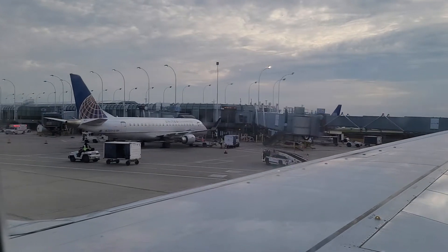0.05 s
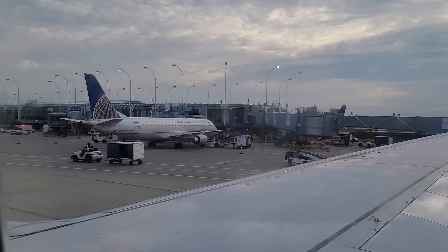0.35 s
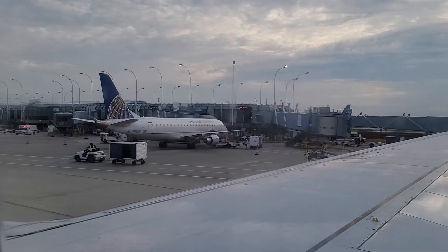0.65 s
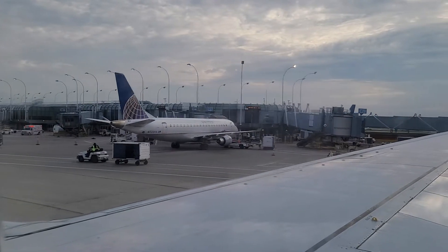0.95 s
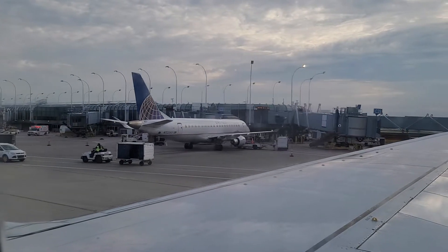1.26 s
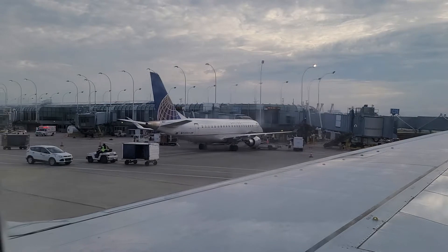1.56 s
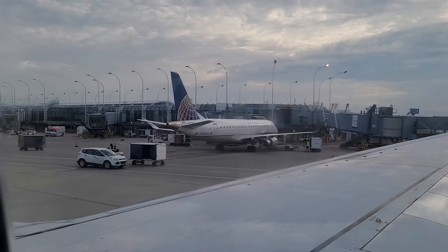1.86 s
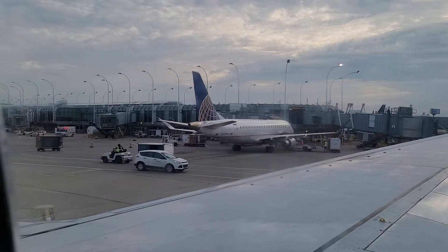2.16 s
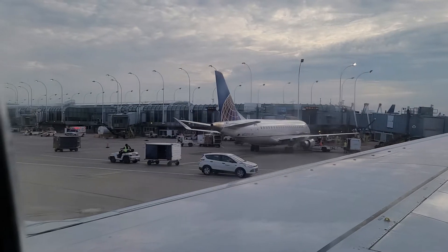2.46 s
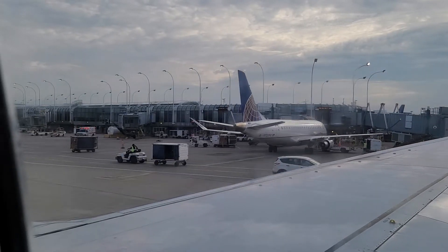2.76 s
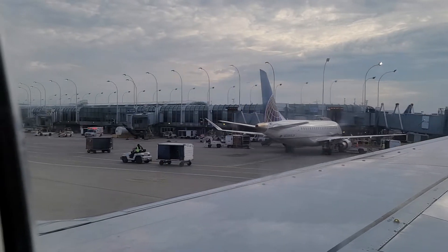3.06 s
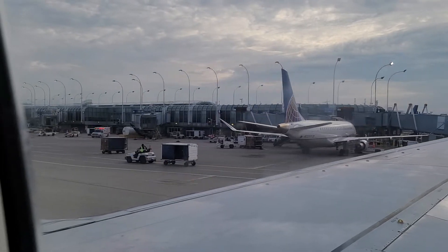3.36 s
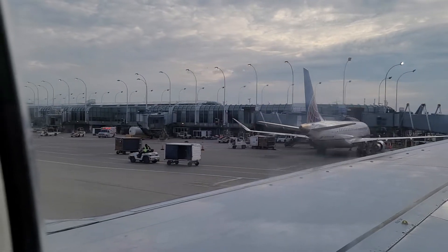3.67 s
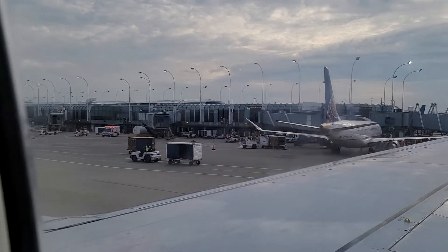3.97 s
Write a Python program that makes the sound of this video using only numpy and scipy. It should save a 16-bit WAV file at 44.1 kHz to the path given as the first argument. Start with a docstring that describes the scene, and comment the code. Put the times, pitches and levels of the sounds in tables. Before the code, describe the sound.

A taxiing airliner rumbles deeply throughout, heard inside the cabin with rushing air vents and faint hums and whines. Low wheel thumps come through the floor at about 0.7 and 2 seconds, with weaker ones earlier. Plastic trim knocks at 1.6 and 2.1 seconds. A brief soft swish ends in a tick near 2.5 seconds, and a soft hollow thud follows at 2.9. Tiny ticks sound close by.

```python
"""A deep rumble of wheels and engines through the fuselage, and the rush of the vents: a taxiing airliner,
heard in stereo from a window seat. Engine shafts, fans and a pump hum and whine over it, each reaching
the two ears differently. Joints in the apron thump through the floor, the cabin trim knocks, and small
things tick close to the microphone. Later come a brief swish and the soft thud of a hollow fitting."""
import sys
import numpy as np
from scipy.fft import rfft, irfft, next_fast_len
from scipy.io import wavfile
from scipy.ndimage import map_coordinates

SR = 44100
rng = np.random.default_rng(int(sys.argv[2]) if len(sys.argv) > 2 else 0)


def unload_wav(signal):
    """Save mono or channel-first audio to the path in sys.argv[1] as 16-bit WAV at rate SR, clipped to [-1, 1]."""
    wavfile.write(
        sys.argv[1],
        SR,
        np.round(np.clip(np.atleast_2d(signal).T, -1, 1) * 32767).astype(np.int16),
    )


N = 176400
TOP_HZ = 15780  # the recorder's band limit
TICK_RISE_S = .0007
WANDER_PER_S = 5  # pace of the pitch drift in the machines and whines


def amp(db):
    """Decibels to gain."""
    return 10 ** (np.asarray(db) / 20)


def unit(x):
    """Scaled to rms 1."""
    return x / np.sqrt(np.mean(x ** 2) + 1e-20)


def along(points, hz):
    """(Hz, value) points read on a log axis."""
    freqs, values = np.transpose(points)
    return np.interp(np.log(hz + 1), np.log(freqs + 1), values)


def clock():
    """The time of every sample, in seconds."""
    return np.arange(N) / SR


def sides(difference):
    """Half of a difference added on the left, half taken from the right."""
    return np.array([[.5], [-.5]]) * difference


def wobble(knots_per_s):
    """A smooth random curve."""
    return map_coordinates(rng.standard_normal(4096), [clock() * knots_per_s], mode="wrap")


def filtered(x, response):
    """x through a filter given as gain against frequency."""
    size = next_fast_len(N + SR // 2)
    return irfft(rfft(x, size) * response(np.fft.rfftfreq(size, 1 / SR)), size)[..., :N]


def noise(response):
    """Two unrelated coloured noises, together of rms 1."""
    return unit(filtered(rng.standard_normal((2, N)), response))


def band(hz, centre_hz, width_hz):
    """Gain of a resonance."""
    return 1 / (1 + ((hz - centre_hz) / width_hz) ** 2 * 2)


def rush(spectrum, likeness, pan, lead):
    """Stereo noise of rms 1 with a given likeness, balance and phase between the ears."""
    def mid_and_side(hz):
        angle = np.arccos(np.clip(along(likeness, hz), -1, 1)) / 2
        return amp(along(spectrum, hz)) * [np.cos(angle), np.sin(angle)]

    mid, side = noise(mid_and_side)
    ears = lambda hz: amp(sides(along(pan, hz))) * np.exp(1j * sides(along(lead, hz)))
    return unit(filtered(np.array([mid + side, mid - side]), ears))


def burst(start_s, rise_s, t60_s):
    """Envelope of a small contact: quick rise, exponential fall."""
    t = np.maximum(clock() - start_s, 0)
    return (1 - np.exp(-t / rise_s)) * amp(-60 * t / t60_s)


def ring(modes, start_s):
    """The fading modes of a struck part, each at a chance phase."""
    out = np.zeros(N)
    for hz, db, t60_s in modes:
        mode = np.sin(2 * np.pi * (hz * clock() + rng.random()))
        out += amp(db) * burst(start_s, rise_s=.002, t60_s=t60_s) * mode
    return out


def rumble():
    """Wheels and engines shake the fuselage, nearly alike in both ears; deep bass follows the ground."""
    # rumble through the fuselage: frequency_hz, relative_db
    spectrum = [(12, -37), (23, -10.5), (31, -11), (50, -1), (64, -3), (100, -5.5), (132, -10.5),
                (165, -10.5), (195, -11), (220, -19), (295, -15), (370, -18), (600, -54), (1500, -91.5)]
    # how alike the two ears are: frequency_hz, correlation
    likeness = [(30, 1), (200, .97), (400, 0.72)]
    # balance at the seat: frequency_hz, left_minus_right_db
    pan = [(25, -3), (70, -0.5), (200, .5)]
    # phase between the ears: frequency_hz, left_lead_rad
    lead = [(30, 0.36), (100, 0.37), (200, .12)]
    # deepest bass over rougher and smoother ground: time_s, gain_db
    ground = [(0, -1.5), (.3, 3.5), (.9, -1.5), (1.8, -2.5), (2.6, 1), (2.9, -6.5), (3.4, 6), (3.75, -1),
              (4, 11.5)]
    level_db, deep_hz = -17.5, 87
    shake = amp(level_db + wobble(7)) * rush(spectrum, likeness, pan, lead)
    deep = filtered(shake, lambda hz: np.exp(-(hz / deep_hz) ** 4))
    return shake - deep + deep * amp(np.interp(clock(), *np.transpose(ground)))


def air():
    """The ventilation rushes through the cabin, and one vent sings in a broad resonance."""
    # rush of the cabin air: frequency_hz, relative_db
    spectrum = [(100, -32.5), (280, -9), (380, 0), (460, -2), (540, -6.5), (690, -9), (850, -11.5),
                (1120, -16), (1330, -11), (1600, -15), (1850, -18), (2300, -16.5), (2580, -19), (2850, -20),
                (3200, -23.5), (3500, -23.5), (4300, -32.5), (5200, -35.5), (6200, -41), (7100, -53),
                (7900, -51), (8500, -45), (10000, -52), (15500, -53.5)]
    # how alike the two ears are: frequency_hz, correlation
    likeness = [(350, .4), (700, 0.4), (1250, 0.57), (1700, 0.7), (2900, 0.41), (4000, 0.36), (7000, .05)]
    # balance at the seat: frequency_hz, left_minus_right_db
    pan = [(350, 0.5), (620, 4), (800, -3.5), (1200, -0.5), (2300, 0), (2800, -2), (4000, -6), (5200, -10),
           (6200, -5.5), (7200, 2)]
    # phase between the ears: frequency_hz, left_lead_rad
    lead = [(350, 0.76), (800, 1.86), (1200, 2.81), (2100, 1.88), (2900, 2.8), (3800, 1.43), (7000, 1.3)]
    flow_db, swell_db = -28, 1.03
    vent_db, vent_pan_db, vent_lead_rad = -39.5, 2.5, 1
    flow = amp(flow_db + swell_db * wobble(4.23)) * rush(spectrum, likeness, pan, lead)
    resonance = lambda hz: band(hz, centre_hz=2086, width_hz=162) * np.exp(1j * sides(vent_lead_rad))
    vent = unit(filtered(rng.standard_normal(N), resonance))
    return flow + amp(vent_db + sides(vent_pan_db)) * vent


def machines():
    """Each shaft or fan gives a tone that wanders a little and flutters in the turbulent air."""
    # rotating machines: pitch_hz, level_db, left_minus_right_db, left_lead_rad, wander_hz, roughness
    tones = [ (147.65, -30, -1, 0.33, .8, .2), (501, -35.5, 0, 1.9, 1.2, .3), (677, -48.5, 6, 0, .1, .1),
             (1498.4, -39.3, -4, 2.3, .7, .35), (1504, -42, -3, 2.3, 5, .7),
             (1692, -55, -7.5, 5, 1.536, .3), (2970.5, -56, -1, 3.1, 1.6, .2),
             (3004, -53.5, -6, -2.4, 5, .5), ]
    flutter_per_s = 22
    out = np.zeros((2, N))
    for hz, db, pan_db, lead_rad, wander_hz, roughness in tones:
        phase = 2 * np.pi * np.cumsum(hz + wander_hz * wobble(WANDER_PER_S)) / SR
        flutter = (wobble(flutter_per_s) + 1j * wobble(flutter_per_s)) / np.sqrt(2)
        steady = np.sqrt(1 - roughness ** 2)
        tone = (steady + roughness * flutter) * np.exp(1j * (phase + sides(lead_rad)))
        out += amp(db + sides(pan_db)) * unit(tone.real)
    return out


def whines():
    """Two whines close in pitch beat, sag and recover together; their balance shifts along the way."""
    # the pair of whines: pitch_hz, early_level_db, late_level_db
    pair = [(992.5, -52.5, -50.5), (1003.3, -43.2, -46)]
    # their common speed: time_s, share_of_usual_speed
    speed_curve = [(1.4, 1), (2.4, .9965), (3.55, .998), (4, 1.001)]
    shift_start_s, shift_end_s = 1.2, 1.7
    lead_rad, wander_hz = 1.1, 1.3
    t = clock()
    speed = np.interp(t, *np.transpose(speed_curve))
    out = np.zeros((2, N))
    for hz, early_db, late_db in pair:
        phase = 2 * np.pi * np.cumsum(hz * speed + wander_hz * wobble(WANDER_PER_S)) / SR
        db = np.interp(t, [shift_start_s, shift_end_s], [early_db, late_db])
        out += amp(db) * unit(np.cos(phase + sides(lead_rad)))
    return out


def pump():
    """A pump hums cleanly on the left and grows fainter as the plane rolls on."""
    # the receding hum: time_s, level_db
    fade = [(0, -30.5), (1.3, -31), (1.6, -35), (4, -34.5)]
    pitch_hz, pan_db, lead_rad = 338.6, 9, -1.63
    t = clock()
    gain = amp(np.interp(t, *np.transpose(fade)) + sides(pan_db))
    return gain * unit(np.sin(2 * np.pi * pitch_hz * t + sides(lead_rad)))


def thumps():
    """A wheel crosses a joint in the apron: the floor swings up over a few cycles and settles."""
    # swings of the floor: start_s, peak_db, pitch_hz, rise_s, fall_s
    swings = [(.335, -13, 76, 0.026, .012), (0.727, -4.5, 91.4, 0.018, 0.02),
              (1.35, -13.5, 41, 0.042, 0.043), (1.996, -11, 153.4, 0.022, 0.012),
              (2.035, -5.5, 54, 0.02, 0.027)]
    out = np.zeros(N)
    for start_s, db, hz, rise_s, fall_s in swings:
        t = np.maximum(clock() - start_s, 0)
        envelope = np.minimum(t / rise_s, 1) * np.exp(-np.maximum(t - rise_s, 0) / fall_s)
        out += amp(db) * envelope * np.sin(2 * np.pi * hz * t)
    return out


def ticks():
    """Faint grainy ticks near the microphone, some duller and some brighter, over a slight crackle."""
    # small ticks close by: start_s, level_db, left_minus_right_db, t60_s, tilt_db_per_octave
    contacts = [(.735, -59, 0, .14, 36), (1.355, -47, 3, .06, 0), (1.4455, -45, 3.5, .018, -2),
                (2.462, -41, -3.5, .014, 2), (2.646, -51.5, 2.5, .04, 3), (2.709, -44.5, 3, .09, -3),
                (3.305, -48.5, 0, .12, 3), (3.967, -51.5, 2.5, .06, 6)]
    # colour of the ticks and crackle: frequency_hz, relative_db
    spectrum = [(20, -70), (1500, -20), (5000, 5), (7400, -2), (8600, 2), (15700, -3)]
    crackle_db, swing_db, grain_db = -75, 5, 4
    out = amp(crackle_db + swing_db * wobble(20)) * noise(lambda hz: amp(along(spectrum, hz)))
    for start_s, db, pan_db, t60_s, tilt_db in contacts:
        colour = lambda hz: amp(along(spectrum, hz) + tilt_db * np.log2(1 + hz)) * (hz < TOP_HZ)
        out += amp(db + sides(pan_db)) * burst(start_s, TICK_RISE_S, t60_s) * noise(colour)
    grain = unit(amp(grain_db * wobble(900)))
    return out * grain


def trim():
    """Plastic panels knock as the cabin flexes: a dull crack and a short ring."""
    # knocks in the trim: start_s, level_db
    knocks = [(1.646, -38), (2.1322, -26.3)]
    # the crack of a panel: frequency_hz, relative_db
    spectrum = [(300, -10), (750, 0), (1400, 1), (2500, -10), (4200, -13), (7500, -27), (15000, -40)]
    # the ring of a panel: pitch_hz, relative_db, t60_s
    modes = [(1310, 4, .07), (1400, 2, .045), (1650, -2, .03)]
    crack = noise(lambda hz: amp(along(spectrum, hz)))
    out = np.zeros((2, N))
    for start_s, db in knocks:
        out += amp(db) * (burst(start_s, rise_s=.001, t60_s=.035) * crack + ring(modes, start_s))
    return out


def swish():
    """A short soft rub in the treble, as of cloth, with a snap near its end."""
    start_s, length_s, edge_s = 2.35, .16, .034
    rub_db, snap_db = -52, -36
    t = clock() - start_s
    rub = amp(rub_db) * np.clip(np.minimum(t, length_s - t) / edge_s, 0, 1)
    snap = amp(snap_db) * burst(start_s=2.462, rise_s=TICK_RISE_S, t60_s=.016)
    return (rub + snap) * noise(lambda hz: band(hz, centre_hz=5540, width_hz=2100) ** 2)


def thud():
    """Something soft bumps a hollow cabin fitting, which rings briefly."""
    # the soft contact: frequency_hz, relative_db
    spectrum = [(100, -19), (180, 0), (380, 1), (650, -14), (900, -19), (3000, -69)]
    # the hollow ring: pitch_hz, level_db, t60_s
    modes = [(174, -16, .2), (268, -13.5, .2), (410, -19.5, .12), (820, -32, .16)]
    start_s, contact_db = 2.885, -14
    contact = unit(filtered(rng.standard_normal(N), lambda hz: amp(along(spectrum, hz))))
    return amp(contact_db) * burst(start_s, rise_s=.005, t60_s=.13) * contact + ring(modes, start_s)


def scene():
    """The cabin from the window seat: a steady drone with small events on top."""
    drone = rumble() + air() + machines() + whines() + pump()
    return drone + thumps() + thud() + trim() + ticks() + swish()


def record(dry):
    """The recorder keeps nothing above its band limit."""
    return filtered(dry, lambda hz: hz < TOP_HZ)


dry = scene()
out = record(dry)
unload_wav(out)
```